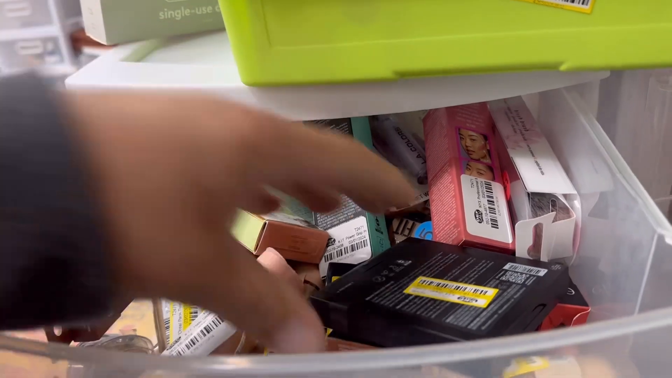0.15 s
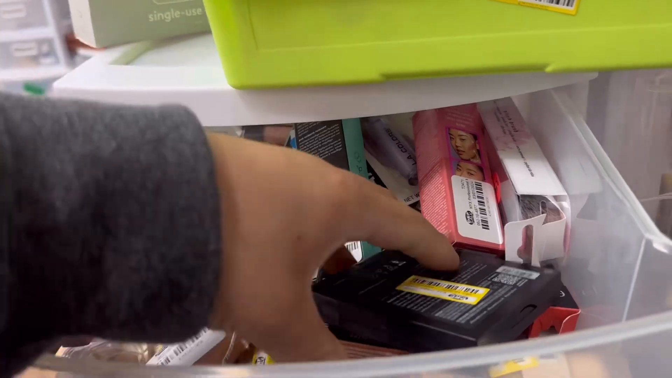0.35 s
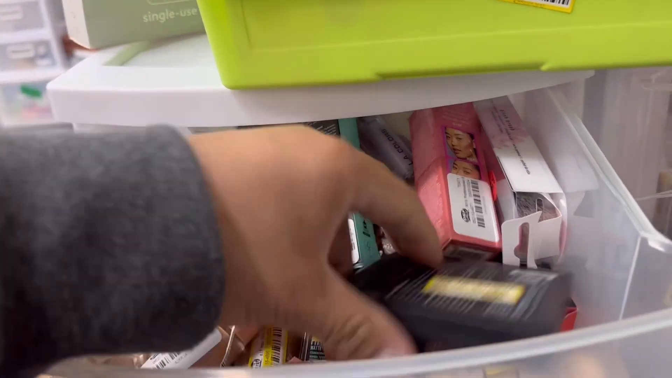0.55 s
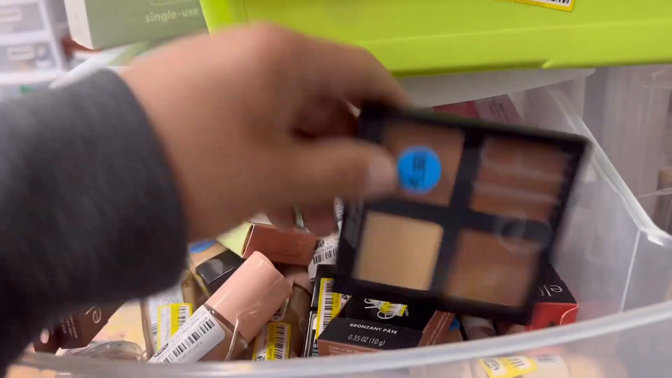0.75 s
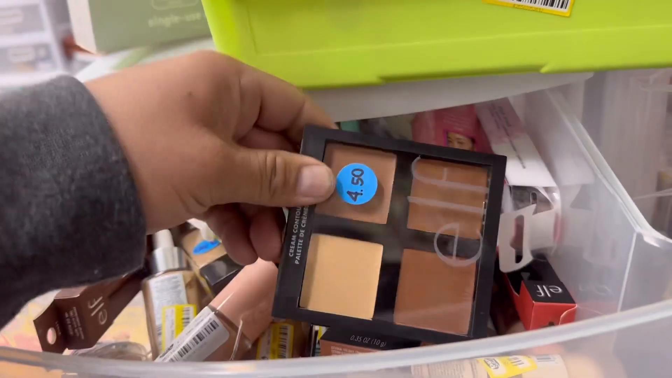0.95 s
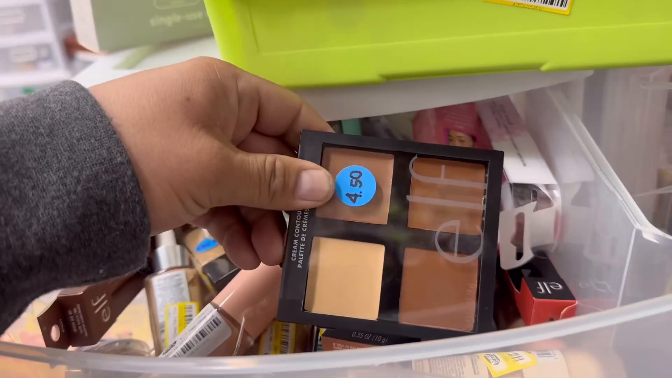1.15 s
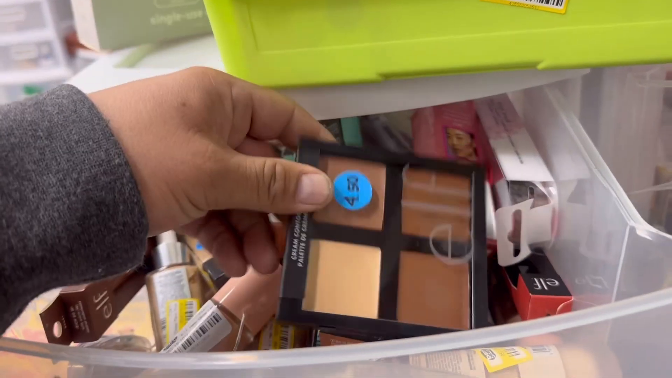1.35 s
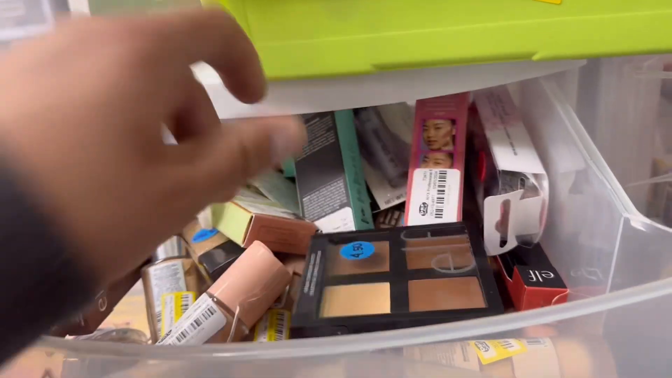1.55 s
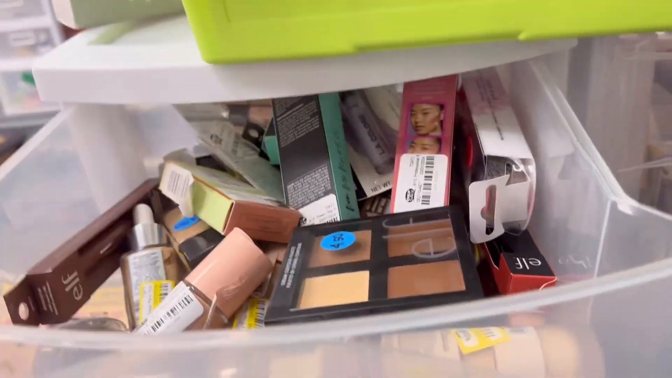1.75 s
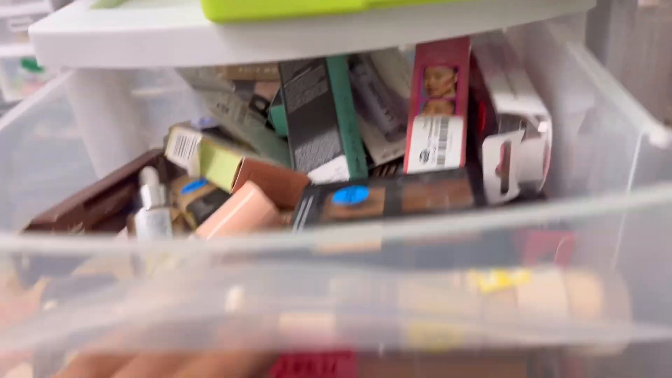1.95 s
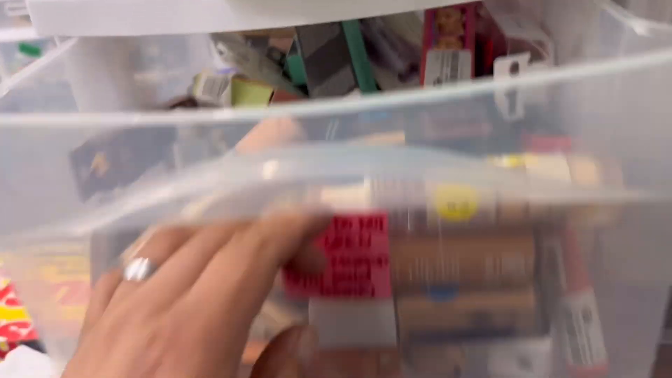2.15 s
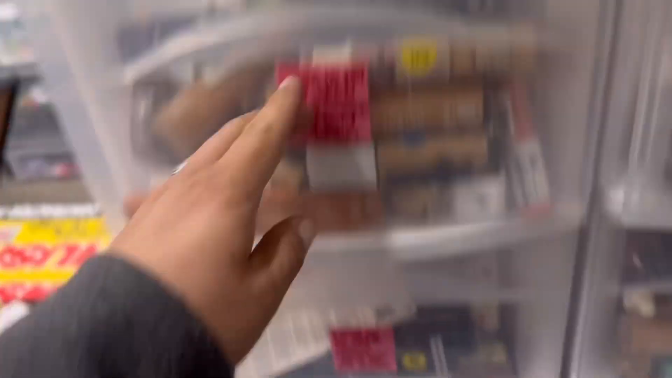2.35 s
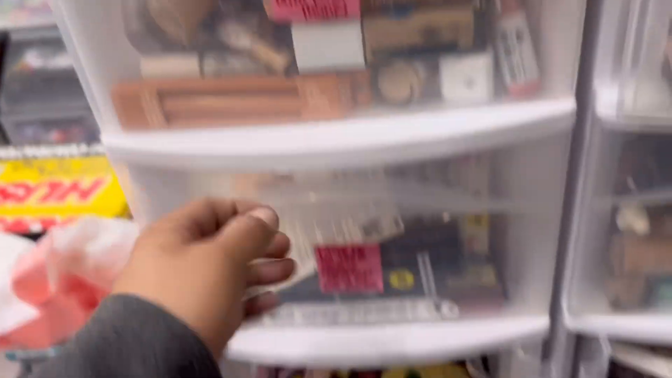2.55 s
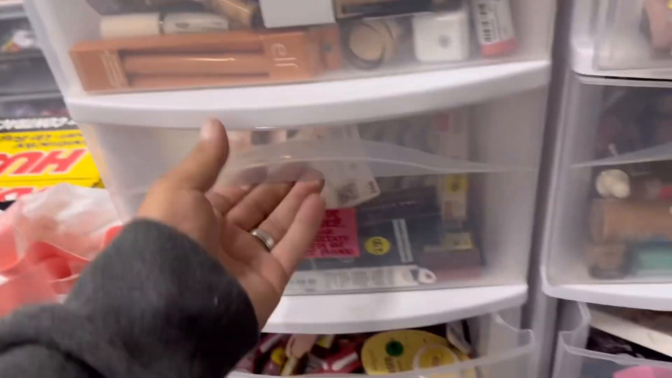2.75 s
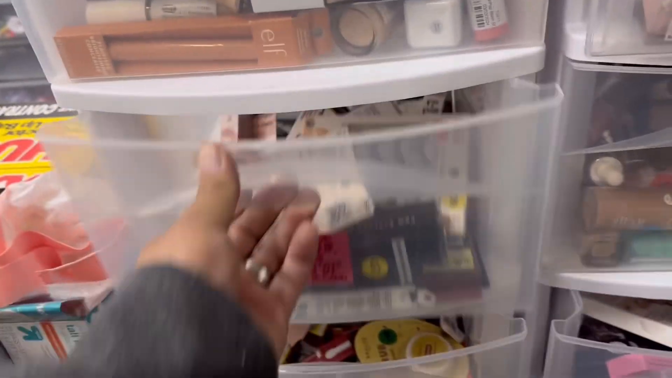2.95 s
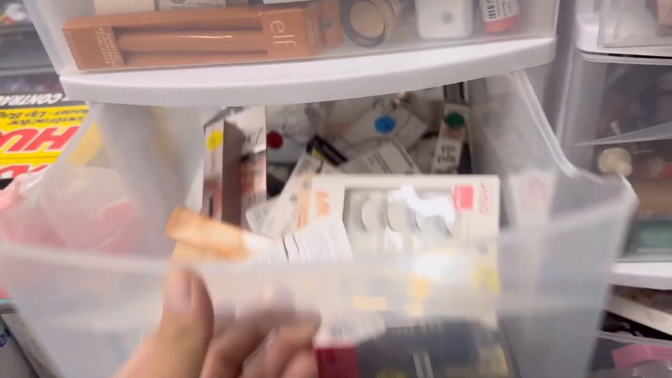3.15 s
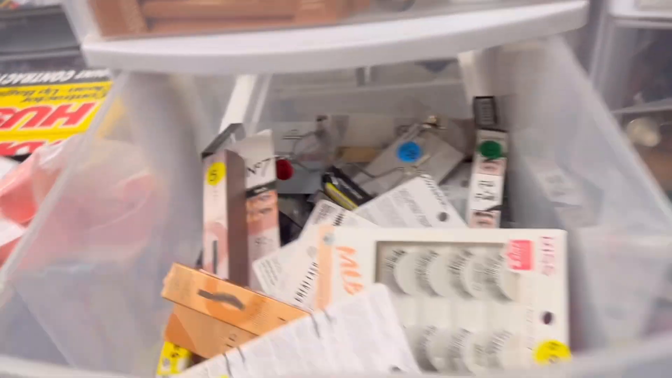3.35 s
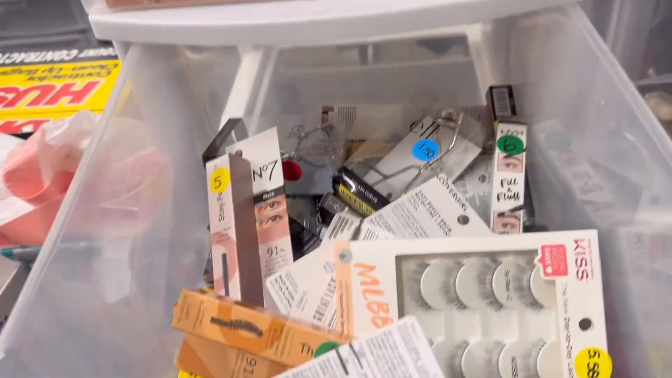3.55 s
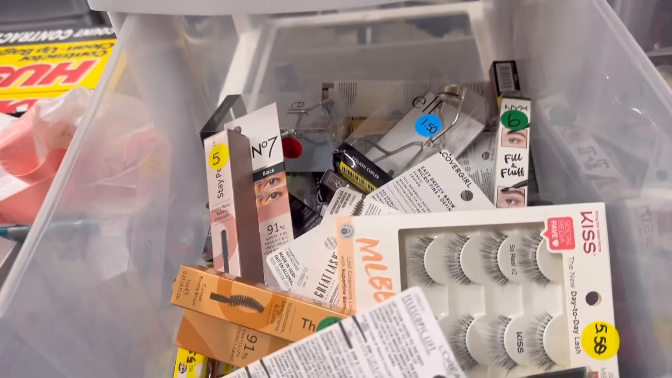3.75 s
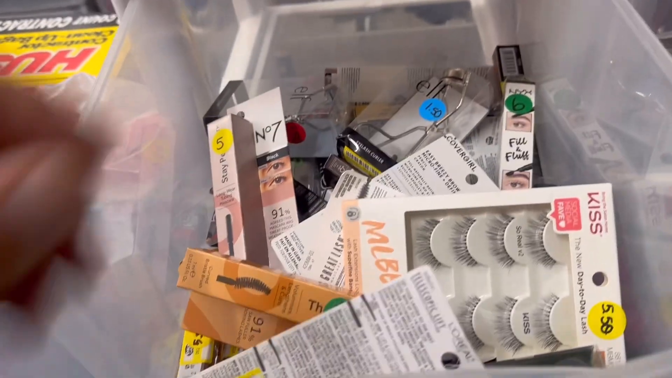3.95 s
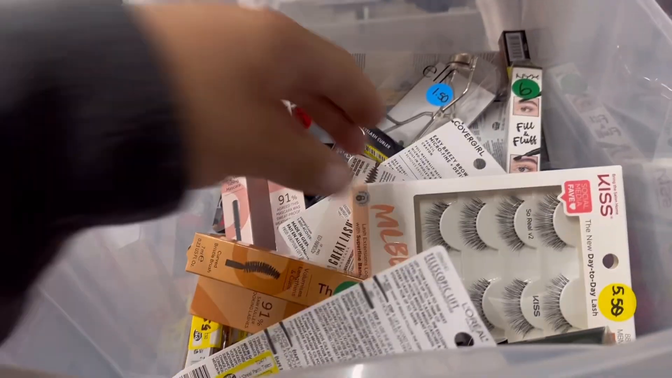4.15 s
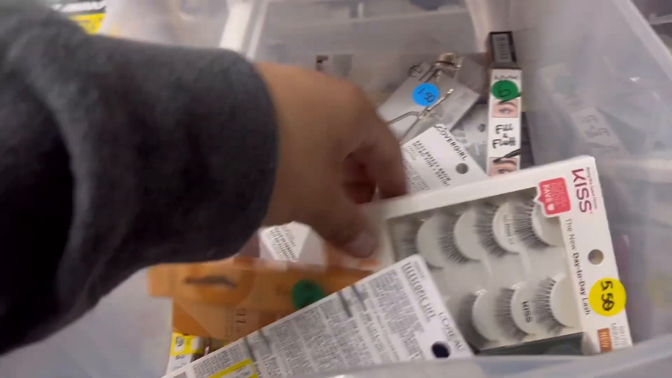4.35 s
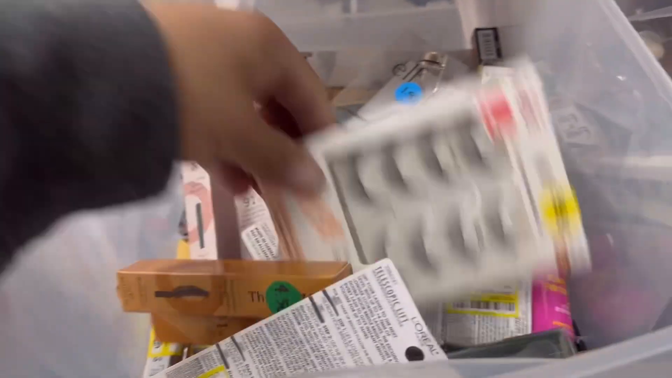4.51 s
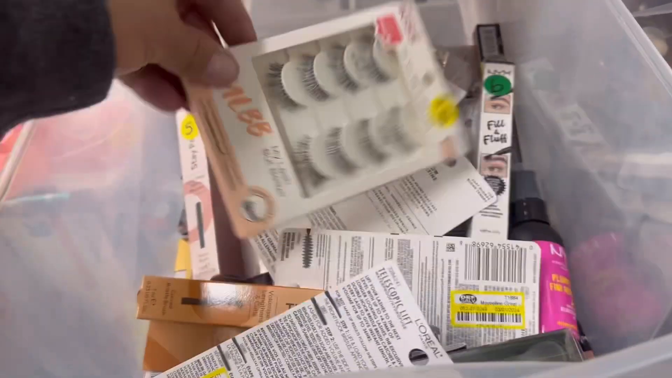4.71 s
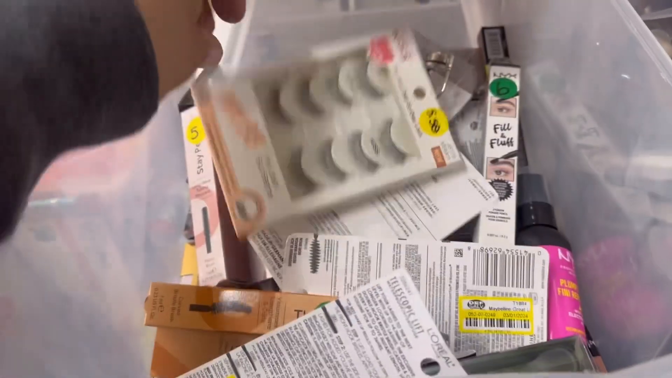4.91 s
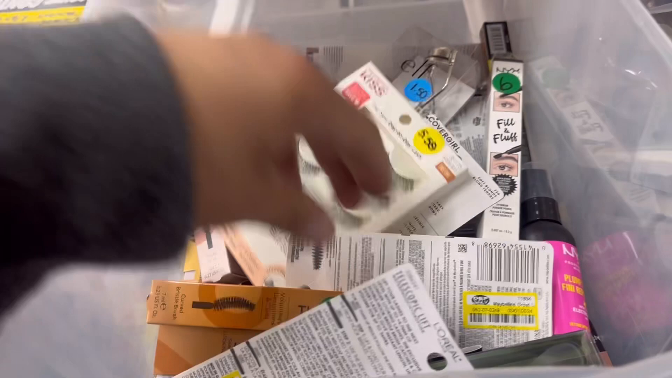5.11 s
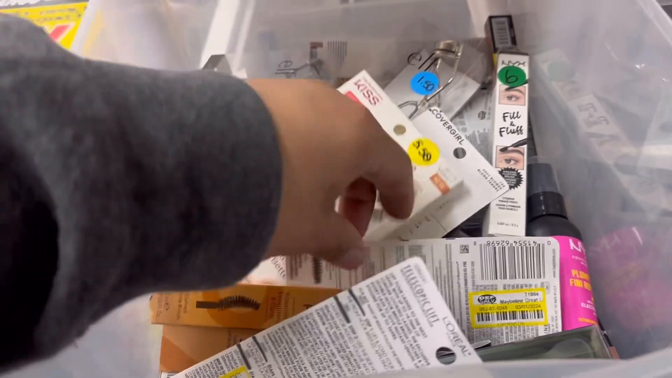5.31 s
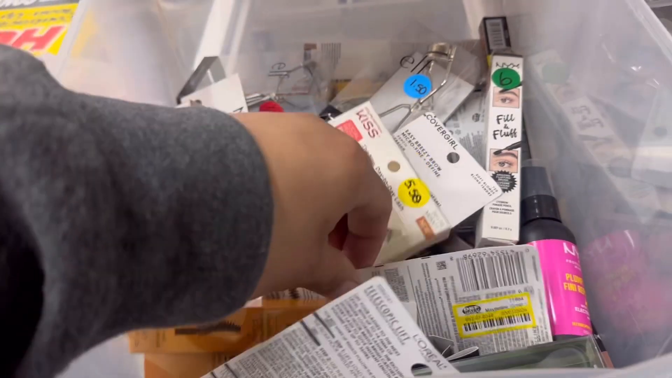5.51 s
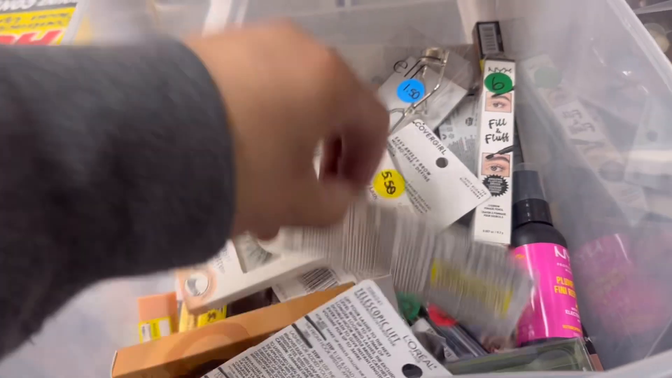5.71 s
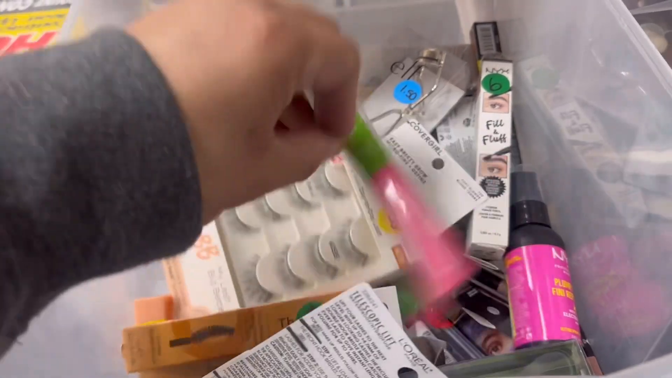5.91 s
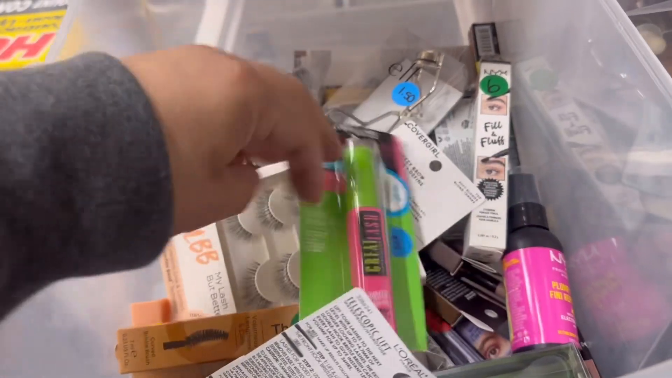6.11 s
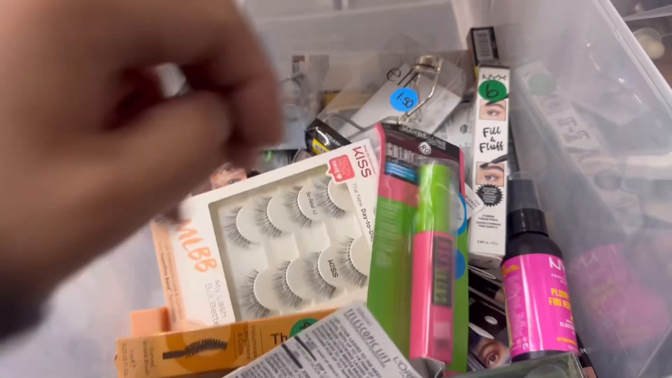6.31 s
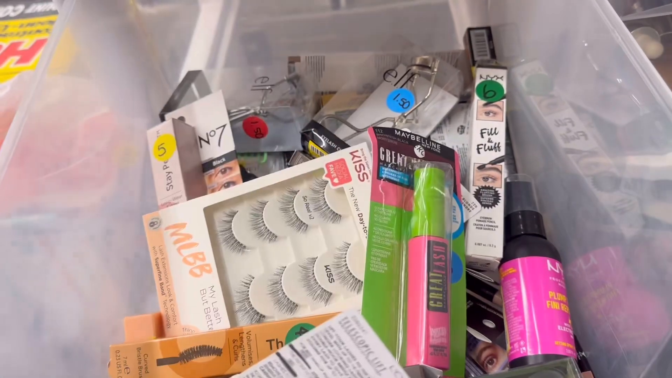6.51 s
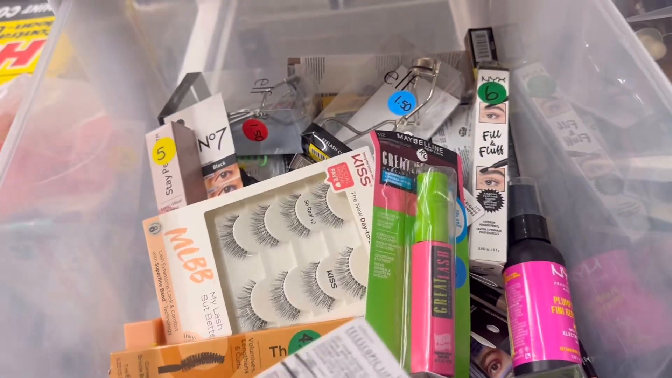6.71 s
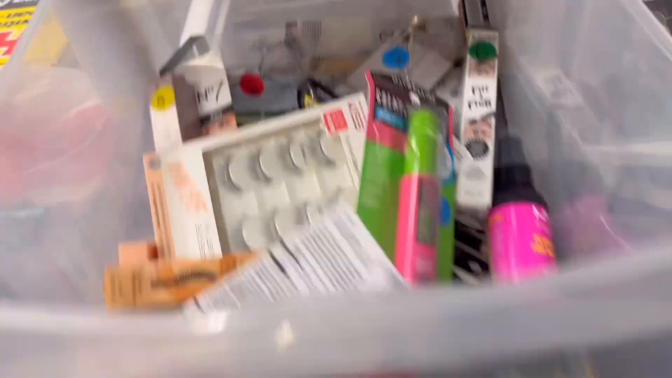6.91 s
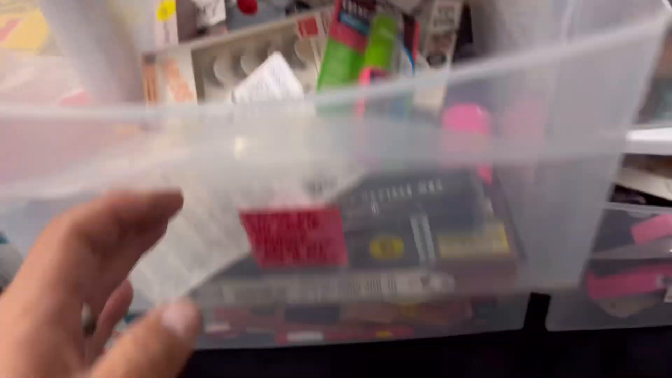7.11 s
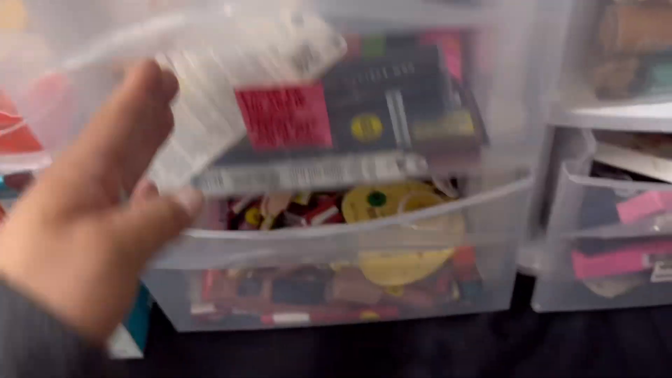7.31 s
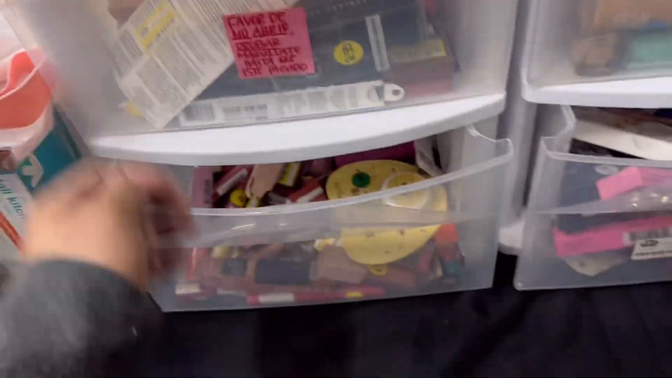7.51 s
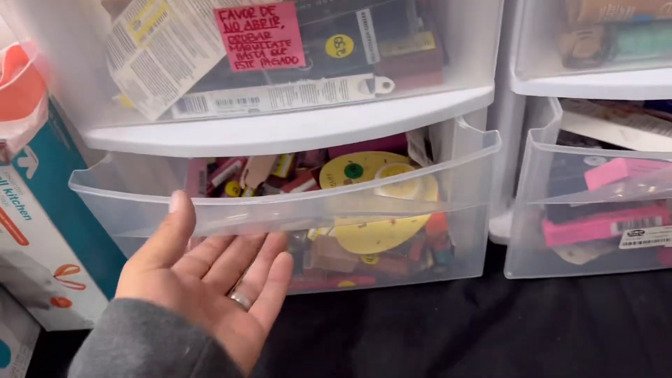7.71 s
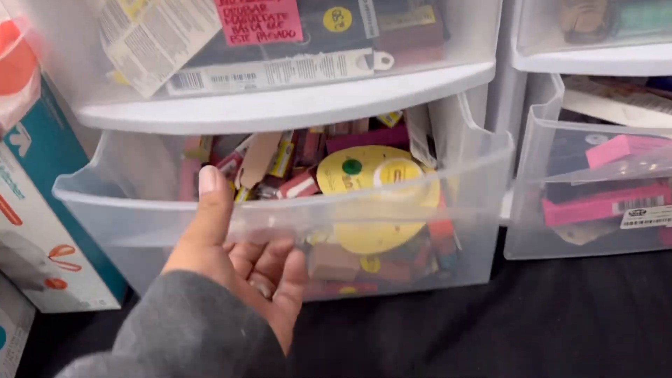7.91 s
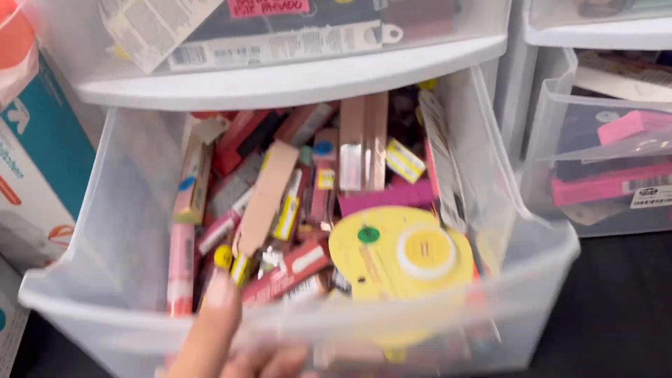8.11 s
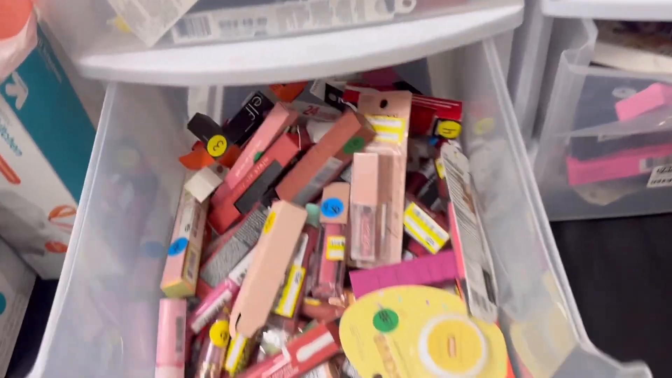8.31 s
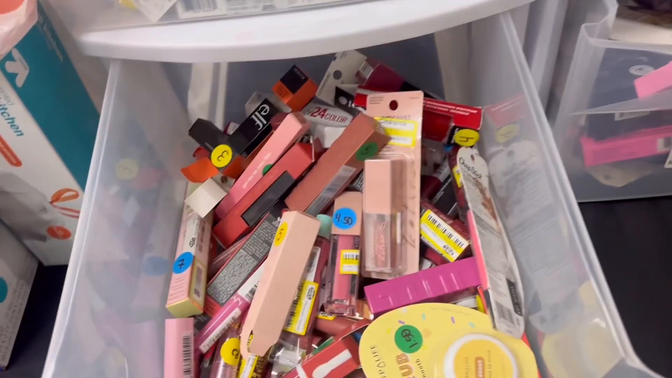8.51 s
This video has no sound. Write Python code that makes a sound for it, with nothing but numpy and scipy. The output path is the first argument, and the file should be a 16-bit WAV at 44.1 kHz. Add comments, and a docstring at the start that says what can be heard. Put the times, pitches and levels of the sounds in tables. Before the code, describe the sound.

Faint air hush in a small quiet room, heard close by a phone. A low shudder and soft jolt open; at 0.2 and 0.55 s packages clack and rustle in a plastic drawer, then it is nearly quiet. At 1.4 s a flat case drops with a sharp, short double clack. From 1.8 s the drawer scrapes shut, with a big hollow boom at 2.4 s and rattling knocks to 2.65 s. Another slides open roughly from 2.85 s, stopping with a thump near 3.5 s. A lull carries a very faint low hum, about 3.8-4.7 s. From 4.2 to 6.4 s cartons and tubes clack, scrape and rustle, strongest near 4.95, 5.7 and 5.95 s. After a short quiet, the drawer rumbles and scrapes shut, 6.7-7.5 s. The last one slides open from 7.8 s, ending in a heavy double boom at 8.35 s, then small settling rustles.

```python
"""A low shudder and a soft jolt come first, over a faint hush of air, then a hand rummages in plastic
drawers full of small cartons and tubes, and slides the drawers shut and open.
Items clack (noise ringing in their modes), thin drawer walls thump and the frame booms (dying cosines),
sliding plastic scrapes and card rustles (uneven bursts of noise), and a faint low hum swells for a moment.
A phone held close hears it through two ports in a small quiet room."""
import sys
import numpy as np
from scipy import signal
from scipy.fft import rfft, irfft, next_fast_len
from scipy.io import wavfile
from scipy.ndimage import uniform_filter1d

SR = 44100
rng = np.random.default_rng(int(sys.argv[2]) if len(sys.argv) > 2 else 0)


def master(y):
    """Save y as 16-bit WAV."""
    cut = np.clip(np.atleast_2d(y).T, -1, 1)
    pcm = np.round(cut * 32767)  # scale
    wavfile.write(sys.argv[1], SR, pcm.astype(np.int16))


N = 377496  # length in samples

# Steady noise of the air: f/Hz, relative level per Hz/dB
AIR_SPECTRUM = [(15, -38), (25, 10), (74, 10), (166, -5), (560, -18.5), (1370, -25), (3520, -33.5),
                (7110, -34), (11300, -49.5), (14400, -37.5), (16000, -48)]
# Rubbing, one table for each stroke of the hand: t/s, wall drone level/dB, scrape level/dB, card rustle level/dB
RUB_STROKES = [
    [(0.1, -62, -76, -77), (0.2, -53, -76, -77), (0.33, -58, -67, -68), (0.42, -59, -58.5, -61.5),
     (0.588, -58, -53, -55), (0.726, -67.5, -64, -60), (0.82, -73, -67, -91)],
    [(1.37, -69, -70, -81), (1.486, -65, -69, -76.5), (1.65, -71, -64, -76)],
    [(1.81, -66, -75, -78), (1.878, -65, -79, -78), (2.0, -48, -51.5, -65.5), (2.312, -46, -42, -48),
     (2.482, -43.5, -50.5, -67), (2.654, -52, -64, -73), (2.815, -59, -58, -71.5)],
    [(2.825, -46, -56, -58), (2.893, -34, -40.5, -49.5), (3.003, -46.5, -46.5, -53),
     (3.057, -45.5, -48.5, -54), (3.373, -48, -53.5, -61.5), (3.493, -67, -60.5, -62),
     (3.58, -75, -74.5, -83)],
    [(4.17, -53, -79, -76), (4.238, -51, -58, -54.5), (4.36, -59, -67, -58), (4.46, -59.5, -58, -53),
     (4.666, -33, -44, -55), (4.772, -69, -71, -57), (4.9, -49, -40, -52)],
    [(4.9, -54, -49, -60), (4.98, -60, -58, -65), (5.106, -40.5, -56, -53.5), (5.228, -52, -46, -59),
     (5.348, -44, -47.5, -53.5), (5.496, -52.5, -52.5, -62), (5.6, -48, -46, -61)],
    [(5.6, -53, -45, -59), (5.822, -59, -62, -61), (5.946, -52, -50, -50), (6.104, -57, -57.5, -59),
     (6.196, -47, -46, -49), (6.326, -59, -46.5, -54), (6.4, -68, -71.5, -80)],
    [(6.63, -64, -73, -80.5), (6.776, -55.5, -60, -72), (6.914, -40, -46, -53.5),
     (7.152, -50.5, -48.5, -57), (7.326, -48, -51.5, -53), (7.452, -44, -54, -67.5), (7.55, -67, -83, -76)],
    [(7.67, -62, -74, -64), (7.76, -61, -61.5, -68), (7.8, -70, -81, -89)],
    [(7.81, -45.5, -50, -69), (7.904, -41, -42, -50), (8.022, -47, -48.5, -49), (8.202, -36.5, -45.5, -52),
     (8.27, -46.5, -45.5, -53.5), (8.392, -63, -64, -59), (8.56, -55, -62, -74)],
]
# Shudder and rumble of the frame and floor: t/s, level/dB
FRAME_SHUDDER = [(0.0, -40), (0.21, -56), (1.29, -70), (2.55, -31), (2.79, -49), (3.43, -43.5), (3.67, -69),
                 (5.89, -43), (6.15, -55.5), (6.7, -51.5), (6.84, -36), (6.96, -37), (7.13, -65),
                 (7.77, -54), (8.27, -38), (8.56, -59)]
# Jolts that shake the whole frame: peak t/s, peak level/dB, strongest ring f/Hz, time to fall 60 dB t/s
FRAME_JOLTS = [(.052, -29.5, 62.6, 0.061), (.2335, -26, 83, 0.066), (.57, -23.5, 99, .064),
               (1.493, -38.5, 73.8, .28), (1.955, -29.5, 93.5, .15), (2.418, -11.5, 70, .093),
               (2.569, -32, 84, .14), (2.614, -29, 85, 0.15), (2.91, -29.5, 110, 0.16),
               (3.482, -30.5, 91.2, 0.3), (4.29, -28.5, 88.5, 0.68), (4.6, -31.5, 101, 0.25),
               (4.955, -26.5, 109, 0.061), (5.217, -31.5, 98, 1), (5.673, -27, 105, 0.26),
               (5.978, -25.5, 115, .21), (6.818, -26.5, 67, 0.33), (6.96, -34.5, 64, 0.33),
               (7.097, -27.5, 69, 0.19), (7.405, -24, 78.6, 0.42), (7.712, -35.5, 76, .1),
               (7.968, -33, 84.4, .06), (8.17, -29.5, 77, .1), (8.352, -12, 93, 0.15),
               (8.3945, -15, 82, 0.16)]
# Items knocking together: peak t/s, approximate peak level/dB, brightest ring f/Hz,
# time for the ring to fall 60 dB t/s, level of the treble crack before colouring/dB
ITEM_CLACKS = [(.161, -46, 1020, .027, -60), (0.211, -16, 1080, 0.039, -22.5),
               (0.2257, -17, 1690, 0.01, -22.5), (.344, -43, 1436, 0.013, -45),
               (0.449, -40.5, 1070, 0.031, -45), (0.553, -21.5, 1300, 0.02, -23.5),
               (.59, -22.5, 1860, 0.016, -48), (0.621, -24, 1020, 0.017, -29.5),
               (0.6675, -32, 1710, 0.045, -24.5), (0.9252, -47.5, 1610, 0.019, -55),
               (1.099, -54.5, 980, .026, -82), (1.38, -28, 960, 0.043, -38),
               (1.391, -17, 1180, 0.0086, -34), (1.397, -11, 1150, 0.018, -17),
               (1.437, -28, 1050, .03, -44), (1.4577, -32, 1372, 0.065, -29),
               (1.4706, -13.5, 920, 0.026, -18.5), (1.5105, -35, 1100, 0.041, -29),
               (1.589, -42, 805, 0.0084, -52), (1.8368, -22.5, 725, 0.0084, -33),
               (1.883, -37.5, 1150, 0.017, -38), (1.9, -39.5, 890, 0.21, -44),
               (1.937, -28, 850, 0.062, -29), (1.954, -33.5, 890, 0.04, -60), (2.161, -32, 795, 0.033, -45),
               (2.259, -32.5, 849, 0.017, -54), (2.3146, -29, 790, 0.016, -31),
               (2.38, -23, 1190, 0.038, -28), (2.392, -12, 830, 0.032, -20), (2.406, -33, 950, 0.024, -30),
               (2.43, -27, 1080, 0.044, -40), (2.531, -25, 1010, 0.017, -38),
               (2.553, -24, 910, 0.03, -27.5), (2.587, -27.5, 1064, 0.053, -30),
               (2.599, -16.5, 1040, 0.006, -27), (2.614, -24, 910, 0.039, -44),
               (2.6316, -15, 880, 0.052, -18), (2.682, -38.5, 1308, 0.12, -43),
               (2.833, -19.5, 1350, 0.02, -49), (2.87, -28.5, 890, 0.024, -41),
               (2.8906, -33.5, 1110, 0.041, -35), (2.939, -34.5, 1380, 0.22, -43),
               (3.046, -31, 1120, .017, -65), (3.172, -32, 2200, 0.049, -28.5),
               (3.201, -31.5, 780, .032, -34), (3.241, -42, 1300, .03, -45), (3.385, -43, 1300, 0.15, -56),
               (3.485, -41, 1500, .04, -56), (3.524, -44.5, 1100, 0.02, -58),
               (4.185, -46.5, 1190, 0.15, -46.5), (4.2501, -36.5, 1200, .021, -53),
               (4.266, -31.5, 1490, 0.011, -28.5), (4.308, -33, 1040, 0.23, -33),
               (4.347, -30.5, 1460, 0.021, -35), (4.414, -34, 1120, 0.051, -39),
               (4.529, -39, 1000, .042, -36), (4.574, -35, 1480, 0.31, -33.5),
               (4.648, -28, 1680, 0.058, -31), (4.666, -31, 1023, 0.034, -29.5),
               (4.725, -19.5, 1300, 0.029, -15.5), (4.735, -28, 1100, 0.028, -32),
               (4.845, -40, 1941, 0.038, -30.5), (4.93, -18, 1250, 0.042, -21),
               (4.947, -24.5, 1030, 0.047, -22), (5.051, -29, 1820, 0.023, -33.5),
               (5.109, -37.5, 1920, 0.062, -29.5), (5.1195, -35.5, 1650, 0.015, -36),
               (5.19, -41.5, 1010, 0.036, -36), (5.201, -32.5, 1400, 0.2, -30),
               (5.205, -19, 1300, 0.036, -24.5), (5.228, -35, 1246, .026, -42),
               (5.313, -35, 1630, 0.11, -41), (5.366, -39.5, 1140, .047, -48),
               (5.567, -38.5, 1330, 0.068, -31.5), (5.641, -33, 1449, 0.033, -33),
               (5.6598, -23, 1340, 0.032, -28), (5.6743, -52, 1468, 0.016, -21),
               (5.717, -18, 1130, 0.036, -17), (5.746, -37, 1100, 0.029, -34.5),
               (5.804, -43, 1000, 0.018, -52), (5.854, -28.5, 930, 0.019, -31),
               (5.882, -30.5, 1370, .047, -45), (5.93, -22.5, 1330, 0.039, -30),
               (5.951, -16, 990, 0.017, -22), (6.003, -35.5, 1828, 0.06, -26.5),
               (6.1005, -33, 2370, .032, -25.5), (6.2837, -35, 1730, 0.054, -33.5),
               (6.365, -45.5, 1242, 0.032, -66), (6.497, -56.5, 1244, 0.067, -56),
               (6.687, -52, 1050, 0.021, -49.5), (6.746, -33, 1090, 0.013, -39),
               (6.772, -37, 853, 0.021, -39), (6.803, -27.5, 1060, 0.023, -34),
               (6.857, -32, 1220, 0.022, -31.5), (6.948, -36, 1339, 0.028, -53),
               (7.009, -33, 1240, 0.014, -35), (7.08, -36, 1050, .02, -34.5),
               (7.302, -37.5, 760, 0.33, -44), (7.37, -34.5, 1150, 0.074, -34.5),
               (7.398, -34.5, 890, 0.069, -39), (7.446, -39, 2037, 0.0033, -29),
               (7.463, -30, 740, 0.032, -62), (7.685, -50, 1670, 0.13, -50),
               (7.712, -47.5, 1860, 0.087, -47), (7.751, -48, 1500, .03, -51),
               (7.8399, -42, 1447, 0.27, -78), (7.958, -34, 1740, 0.017, -52),
               (8.087, -35, 1390, 0.035, -48), (8.313, -31, 980, 0.28, -42),
               (8.338, -27.5, 860, 0.2, -32.5), (8.368, -23.5, 1380, 0.065, -28.5),
               (8.543, -43.5, 1800, 0.047, -50)]
# Blows on the drawer walls: peak t/s, peak level/dB, strongest ring f/Hz, time to fall 60 dB t/s
WALL_THUMPS = [(.22, -15.5, 239, .031), (.4335, -30.5, 303, 0.046), (.565, -16.5, 266, 0.043),
               (.627, -25, 267, 0.063), (.702, -34.5, 280, .043), (1.3987, -11.5, 370, 0.04),
               (1.43, -24, 330, .076), (1.4796, -20.5, 395, 0.069), (1.824, -33.5, 300, 0.026),
               (1.841, -19, 365, 0.023), (1.904, -28, 373, 0.12), (1.941, -27.5, 256, 0.36),
               (2.164, -24.5, 326, 0.016), (2.266, -24.5, 214, 0.022), (2.316, -23, 318, 0.028),
               (2.334, -28, 207, .03), (2.397, -9.5, 317, 0.096), (2.443, -20.5, 231, 0.079),
               (2.534, -22, 231, 0.038), (2.558, -16.5, 275, 0.037), (2.594, -15.5, 283, 0.24),
               (2.638, -9.5, 230, .061), (2.692, -21.5, 192, 0.042), (2.847, -21.5, 227, 0.03),
               (2.878, -15, 270, 0.11), (2.951, -23.5, 340, 0.11), (3.216, -23.5, 366, 0.026),
               (3.4, -30.5, 326, 0.23), (3.446, -26, 297, 0.041), (3.476, -13.5, 328, 0.039),
               (4.256, -20.5, 257, .082), (4.331, -22, 242, 0.14), (4.416, -27, 440, 0.039),
               (4.592, -22.5, 332, .081), (4.655, -25.5, 321, 0.061), (4.727, -18, 398, 0.052),
               (4.908, -27, 484, 0.045), (4.943, -10.5, 420, 0.073), (5.21, -17.5, 374, .12),
               (5.315, -27, 316, 0.25), (5.577, -29.5, 386, 0.15), (5.611, -26.5, 304, 0.044),
               (5.666, -19, 358, 0.025), (5.722, -17.5, 387, 0.04), (5.742, -23, 336, 0.1),
               (5.848, -27, 320, .16), (5.885, -26.5, 372, .052), (5.933, -24.5, 341, .02),
               (5.9556, -12.5, 292, 0.085), (6.104, -34, 441, 0.082), (6.305, -25, 416, 0.035),
               (6.327, -29, 332, .032), (6.654, -36.5, 186, 0.43), (6.75, -18, 258, 0.061),
               (6.799, -14.5, 267, 0.24), (6.867, -18, 280, 0.061), (6.951, -26.5, 305, 0.13),
               (7.026, -26, 344, 0.19), (7.082, -19, 346, 0.031), (7.3755, -23.5, 393, 0.062),
               (7.46, -25.5, 199, 0.14), (7.728, -35, 240, 0.056), (7.866, -27.5, 262, 0.12),
               (7.969, -27.5, 340, 0.048), (8.241, -26.5, 216, 0.025), (8.319, -12.5, 210, 0.12),
               (8.344, -9.5, 202, 0.027), (8.375, -16.5, 374, 0.065)]
# Ringing modes of the items: f/Hz, width before widening/Hz, relative level/dB
ITEM_RINGS = [(630, 280, 10), (760, 680, 4.5), (888, 300, -2), (1133, 620, 7.5), (1470, 1500, -1.5),
              (1670, 130, -12), (1968, 680, -5.5), (2345, 40, -3), (2477, 280, -13.5), (2910, 810, -14),
              (3260, 180, -16.5)]
# Ringing modes of the drawer walls: f/Hz, width before widening/Hz, relative level/dB
WALL_RINGS = [(48, 7.5, -6.5), (56.6, 27, 4.5), (79, 33, -2.5), (102, 21, -3), (128.2, 30, 4.5),
              (141, 32, 2), (185.2, 8.8, -2.5), (226.5, 12, -7), (260.3, 96, -8), (319, 23, -8),
              (370.4, 55, -8), (416.3, 170, -10), (486.5, 210, -8), (543, 39, -12.5)]
# Tone of card rustle and treble cracks: f/Hz, relative level per Hz/dB
RUSTLE_SPECTRUM = [(1470, -31), (2500, -5), (4010, -8.5), (4410, -5.5), (7730, -7), (9800, -6.5),
                   (11600, -17), (15100, -14), (15900, -26), (16500, -41)]
# How much of the sideways sound reaches the ports: f/Hz, level/dB
SIDE_SHARE = [(60, -19.5), (200, -15.5), (380, -16), (700, -4), (1290, -8.5), (2380, 0), (4400, -7),
              (8100, -1), (10500, -10.5), (13000, -25.5), (15500, 5)]
# Difference in tone between the ports: f/Hz, left minus right level/dB
LEFT_MINUS_RIGHT = [(60, -0.5), (110, 1), (200, -1), (380, 3), (700, -3), (1290, -2.5), (2380, -3.5),
                    (4400, 4.5), (8120, -0.5), (15000, 0)]

AIR_DB = -53
# contacts pile up over the rise; the peak stands over the mean chatter by the crest
CLACK_RISE_S, CREST_DB = .003, 1
CRACK_SHORTER = 1.3  # power on the envelope, so the treble dies sooner
WALL_RISE_CYCLES, FRAME_RISE_CYCLES = 2.8, 3  # a soft blow builds over a few swings
# after a blow the load settles: level under the blow's peak, and how fast it dies
WALL_SETTLE_DB, ITEM_SETTLE_DB, SETTLE_T60_S = -29.5, -40, 0.21
CARD_SETTLE_DB, CARD_T60_S = -19.5, 0.089  # card rustles on after a crack
GRAZE_DB, GRAZE_T60_S = -24, .05  # items graze each other just before they knock
# the hum ends at HUM_DB and begins HUM_SWELL_DB lower
HUM_HZ, HUM_DB, HUM_FROM_S, HUM_TO_S, HUM_SWELL_DB = 170, -58.5, 3.8, 4.7, 4
ROOM_T60_S, ROOM_DB, ROOM_HZ = 0.23, -17.5, 3900
PORT_LAG_S, PORT_LAG_HZ = .000035, 9300  # the lag fades out around PORT_LAG_HZ
TOP_HZ = 15900


def undb(db):
    """Turn decibels into a plain multiplier."""
    return 10 ** (np.asarray(db) / 20)


def level(x, db):
    """Scale a sound to a given average (RMS) level."""
    return x * undb(db) / np.sqrt(np.mean(x ** 2))


def colour(x, points):
    """Filter by (f/Hz, level/dB) points joined on a log-frequency axis."""
    hz, db = np.transpose(points)
    size = next_fast_len(x.shape[-1])
    f = np.arange(size // 2 + 1) * SR / size + 1  # the added 1 Hz avoids log(0)
    gain = undb(np.interp(np.log(f), np.log(hz), db))
    return irfft(rfft(x, size) * gain, size)[..., :x.shape[-1]]


def band(x, lo_hz, hi_hz):
    """Keep the sound between two frequencies."""
    return signal.sosfilt(signal.butter(2, [lo_hz, hi_hz], "band", fs=SR, output="sos"), x)


def resonate(x, modes, widen):
    """A body rings at its modes: a sum of narrow band-passes."""
    out = 0
    for hz, width, db in modes:
        peak = signal.iirpeak(hz, hz / (widen * width), SR)
        out = out + undb(db) * signal.lfilter(*peak, x)
    return out


def ringing(force, modes, widen):
    """A steep body: the force passes its modes twice, so mode levels count twice."""
    return resonate(resonate(force, modes, widen), modes, widen)


def near(modes, hz, focus):
    """The modes as one spot excites them, levels halved: those far from hz speak less."""
    f, width, db = np.transpose(modes)
    return np.transpose([f, width, db / 2 - focus * np.log2(f / hz) ** 2])


def swell(rise_s, t60, start_db):
    """Time from the peak and the envelope of a blow: a first contact, more pile up, then the body dies away."""
    t = np.arange(-int(rise_s * SR), int(t60 * SR)) / SR
    touch = np.minimum((t + rise_s) / (0.13 * rise_s), 1)
    # a negative start_db begins the blow that far below its peak, then it climbs to the peak
    db = np.where(t < 0, -start_db * t / rise_s, -60 * t / t60)
    return t, touch * undb(db)


def add(out, s, sound):
    """Mix a short sound into the scene from s seconds on."""
    i = max(int(s * SR), 0)
    out[:, i:i + sound.shape[1]] += sound[:, :N - i]


def walk(rate):
    """Random levels held 1 / rate s and slewed, with a spread near 1."""
    k = int(SR / rate)
    held = np.repeat(rng.standard_normal(N // k + 1), k)
    return uniform_filter1d(held, k)[:N]


def air():
    """Steady coloured noise, separate for the ahead and sideways sound."""
    return level(colour(rng.standard_normal((2, N)), AIR_SPECTRUM), AIR_DB)


def slips(rate, spread_db, tail_s, steady):
    """Stick-slip force: noise in uneven bursts, each with a short tail, over a steady share."""
    happens = rng.random(N) < rate / SR
    size = happens * undb(spread_db * np.minimum(rng.exponential(size=N), 3.5))
    bursts = signal.lfilter([1], [1, -np.exp(-1 / (tail_s * SR))], size)
    return (level(bursts, 0) + steady) * rng.standard_normal((2, N))


def settling(s, db, t60, way=1):
    """Gain that jumps at every blow and dies away; way -1 grows towards the blow instead."""
    kicks = np.zeros(N)
    kicks[(s * SR).astype(int)] = undb(db)
    return signal.lfilter([1], [1, -undb(-60 / (t60 * SR))], kicks[::way])[::way]


def rubbing_gains(t):
    """Levels of wall drone, scrape and rustle: the strokes, plus grazing before and settling after blows."""
    gains = np.zeros((3, N))
    for stroke in RUB_STROKES:
        s, *columns = np.transpose(stroke)
        gains += [undb(np.interp(t, s, c, left=-120, right=-120)) for c in columns]
    thump_s, thump_db, *_ = np.transpose(WALL_THUMPS)
    clack_s, clack_db, *_, crack_db = np.transpose(ITEM_CLACKS)
    gains[0] += settling(thump_s, thump_db + WALL_SETTLE_DB, SETTLE_T60_S)
    gains[1] += settling(clack_s, clack_db + ITEM_SETTLE_DB, SETTLE_T60_S)
    gains[1] += settling(clack_s, clack_db + GRAZE_DB, GRAZE_T60_S, way=-1)
    gains[2] += settling(clack_s, crack_db + CARD_SETTLE_DB, CARD_T60_S)
    gains[2] += settling(clack_s, crack_db + GRAZE_DB, GRAZE_T60_S, way=-1)
    return uniform_filter1d(gains, size=400)  # a stroke starts within a few ms


def scraping():
    """Grit rings the items; as the load shifts, other modes take the lead."""
    grit = slips(rate=110, spread_db=3.4, tail_s=.003, steady=.9)
    out = np.zeros((2, N))
    for hz, width, db in ITEM_RINGS:
        out += undb(3.5 * walk(rate=12)) * ringing(grit, [(hz, width, db / 2)], widen=1.3)
    return out


def rustling():
    """Card crackles in fine bursts, and neighbouring treble bands flicker apart."""
    crackle = slips(rate=260, spread_db=3, tail_s=.0015, steady=1.3)
    edges = 2000 * 1.3 ** np.arange(9)  # band limits in Hz
    patchy = np.zeros((2, N))
    for k in range(len(edges) - 1):
        # alternate signs keep bands from cancelling where they meet
        patchy += (-1) ** k * undb(4.4 * walk(rate=25)) * band(crackle, *edges[k:k + 2])
    return colour(patchy, RUSTLE_SPECTRUM)


def rubbing():
    """Sliding shakes the frame and walls, scrapes the items and rustles the card."""
    t = np.arange(N) / SR
    walls = resonate(slips(rate=33, spread_db=0.0, tail_s=0.025, steady=0.25), WALL_RINGS, widen=1.9)
    frame = level(band(walls, 32, 77), 0) * undb(np.interp(t, *np.transpose(FRAME_SHUDDER)))
    layers = band(walls, 190, 470), scraping(), rustling()
    return frame + sum(level(x, 0) * gain for x, gain in zip(layers, rubbing_gains(t)))


def blows(table, rise_cycles, focus, scatter_db, detune, slip):
    """Soft blows set the wall modes swinging nearly in step, each with its own share."""
    out = np.zeros((2, N))
    for s, peak_db, hz, t60 in table:
        t, shape = swell(rise_cycles / hz, t60, start_db=-10.5)
        f, _, db = near(WALL_RINGS, hz, focus).T
        pitch, share, phase_ahead, phase_side, common = rng.standard_normal((5, len(f)))
        mode_hz = f * (1 + detune * pitch)
        turn = 2 * np.pi * mode_hz[:, None] * t + np.pi * common[0]
        gain = undb(db + scatter_db * share)
        swing = shape * np.array([gain @ np.cos(turn + slip * phase[:, None])
                                  for phase in (phase_ahead, phase_side)])
        add(out, s + t[0], swing * undb(peak_db) / np.abs(swing[0]).max())
    return out


def jolts():
    """The whole frame booms: soft blows that favour the lowest modes."""
    return blows(FRAME_JOLTS, FRAME_RISE_CYCLES, focus=17, scatter_db=1.0, detune=0.079, slip=1.0)


def clacks():
    """A knock is a cluster of contacts that chatters in the item's damped modes; its treble crack is shorter."""
    rings, cracks = np.zeros((2, N)), np.zeros((2, N))
    for s, peak_db, hz, t60, crack_db in ITEM_CLACKS:
        t, shape = swell(CLACK_RISE_S, t60, start_db=-11)
        force = rng.standard_normal((4, len(t)))
        modes = near(ITEM_RINGS, hz, focus=11.0)
        modes[:, 2] += 0.58 * rng.standard_normal(len(modes))  # every item has its own voice
        chatter = ringing(shape * force[:2], modes, widen=0.74)
        # the power of a blow is set by its strength alone
        even_power = np.sqrt(np.sum(shape ** 2) / np.sum(chatter[0] ** 2))
        add(rings, s + t[0], chatter * undb(peak_db - CREST_DB) * even_power)
        # harder and softer edges tilt the crack up or down
        edge = np.clip(0.11 * rng.standard_normal(), -.8, .8)
        tilted = signal.lfilter([1, edge], [np.hypot(1, edge)], force[2:])
        add(cracks, s + t[0], undb(crack_db) * shape ** CRACK_SHORTER * tilted)
    return rings + colour(cracks, RUSTLE_SPECTRUM)


def thumps():
    """Thin drawer walls swing in their modes after a soft blow."""
    return blows(WALL_THUMPS, WALL_RISE_CYCLES, focus=14, scatter_db=2.5, detune=.05, slip=1.0)


def hum():
    """A near-pure tone that grows slowly and stops."""
    t = np.arange(N) / SR
    on = uniform_filter1d(1. * (t > HUM_FROM_S) * (t < HUM_TO_S), size=1500)
    progress = np.clip((t - HUM_TO_S) / (HUM_TO_S - HUM_FROM_S), -1, 0)  # -1 at the start, 0 at the end
    tone = np.sqrt(2) * np.sin(2 * np.pi * HUM_HZ * t)
    return on * undb(HUM_DB + HUM_SWELL_DB * progress) * tone * np.array([[1], [1]])


def room(x):
    """A short dull tail of reflections, fed by the sound from ahead."""
    t = np.arange(int(SR * ROOM_T60_S)) / SR
    noise = band(rng.standard_normal((2, len(t))), 140, ROOM_HZ)
    tail = noise * undb(-60 * t / ROOM_T60_S) * (t > .004)
    tail = tail / np.sqrt(np.sum(tail[0] ** 2))
    return undb(ROOM_DB) * signal.fftconvolve(x[:1], tail, axes=1)[:, :N]


def ports(ahead, sideways):
    """Two close ports agree in the bass and part in the treble; the left one leads, except at the very top."""
    size = next_fast_len(N)
    f = np.arange(size // 2 + 1) * SR / size
    # each port is shifted by half the lag
    lead = np.exp(1j * np.pi * f * PORT_LAG_S / (1 + (f / PORT_LAG_HZ) ** 8))
    side = colour(sideways, SIDE_SHARE)
    hz, db = np.transpose(LEFT_MINUS_RIGHT)
    heard = []
    for way in (1, -1):  # left, right
        x = irfft(rfft(ahead, size) * lead ** way, size)[:N] + way * side
        heard.append(colour(x, np.transpose([hz, way * db / 2])))
    return np.array(heard)


def scene():
    """Close sounds with their room tail, the hum and the air, heard at the two ports."""
    close = rubbing() + jolts() + clacks() + thumps()
    return ports(*(air() + close + room(close) + hum()))


def record(dry):
    """The phone cuts the lowest bass and the top."""
    thin = signal.sosfilt(signal.butter(3, 48, "high", fs=SR, output="sos"), dry)
    return signal.sosfilt(signal.ellip(10, .2, 70, TOP_HZ, fs=SR, output="sos"), thin)


dry = scene()
out = record(dry)
master(out)
```